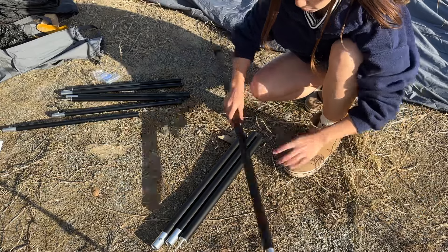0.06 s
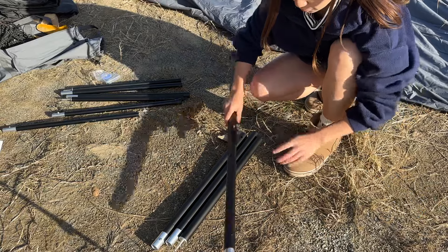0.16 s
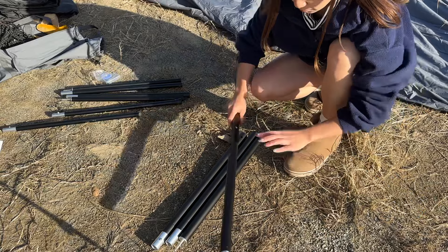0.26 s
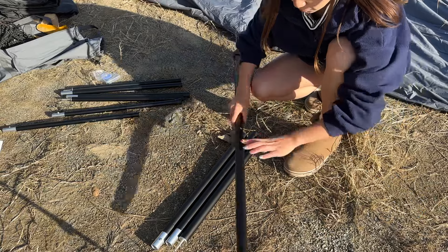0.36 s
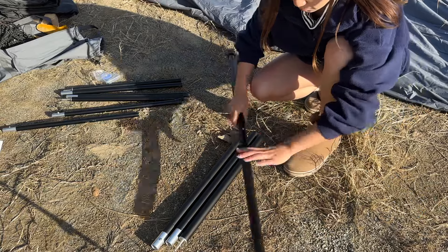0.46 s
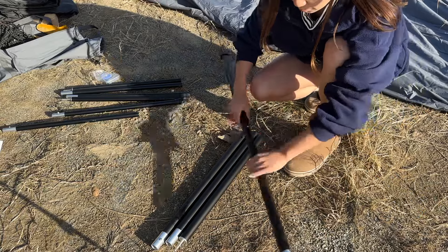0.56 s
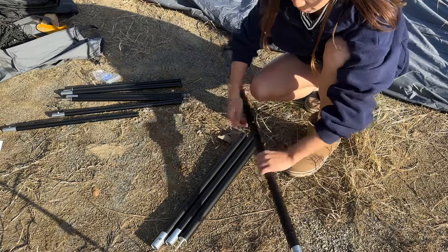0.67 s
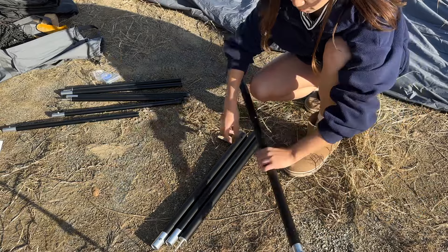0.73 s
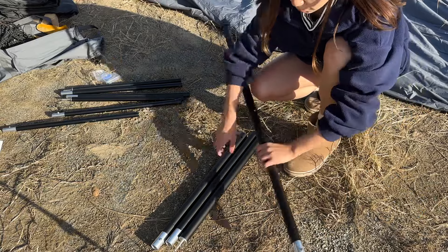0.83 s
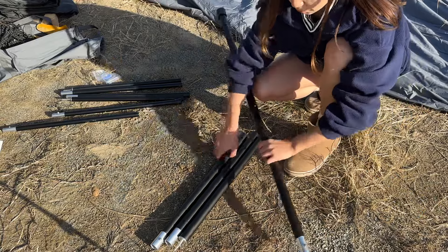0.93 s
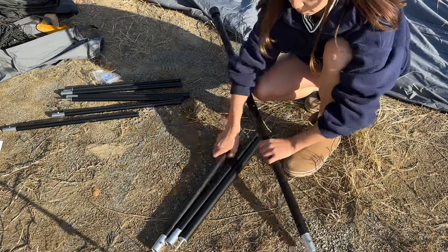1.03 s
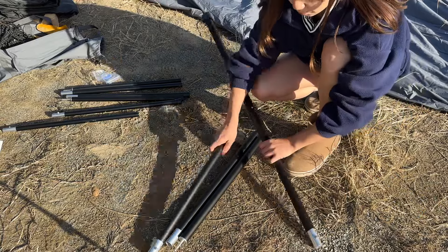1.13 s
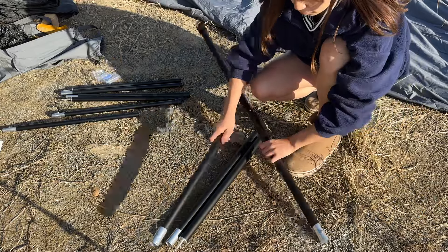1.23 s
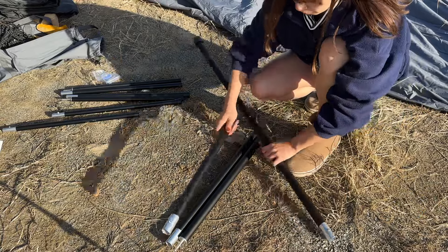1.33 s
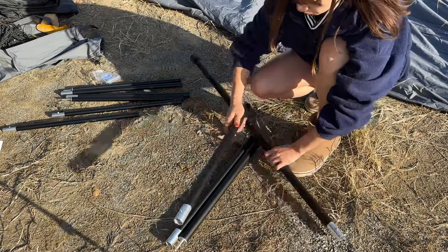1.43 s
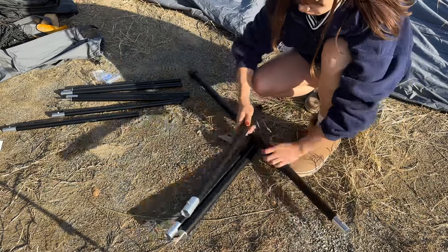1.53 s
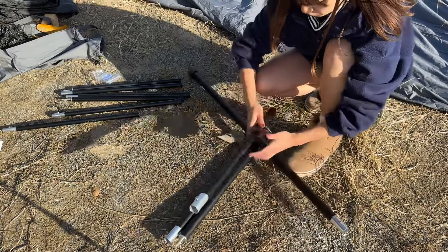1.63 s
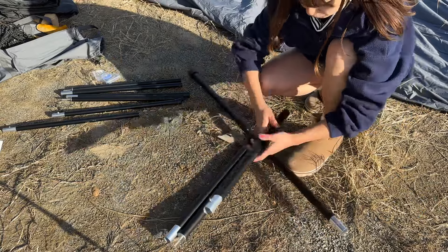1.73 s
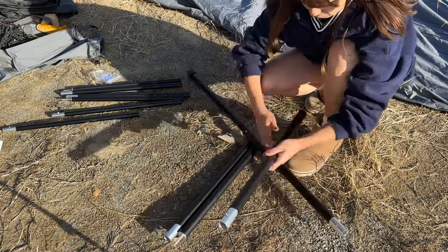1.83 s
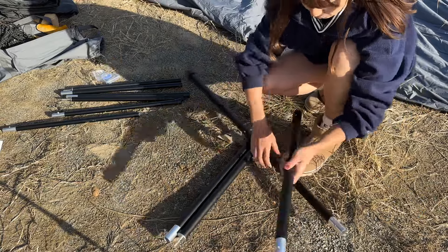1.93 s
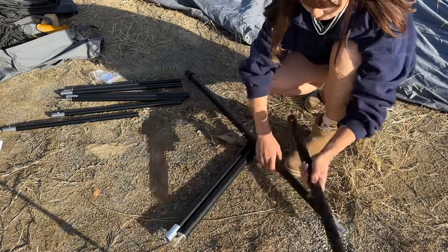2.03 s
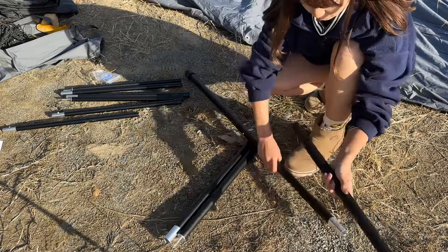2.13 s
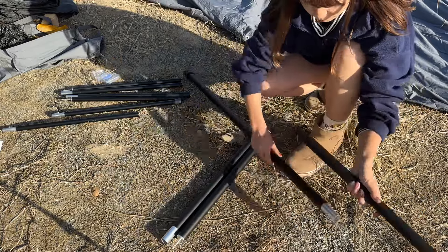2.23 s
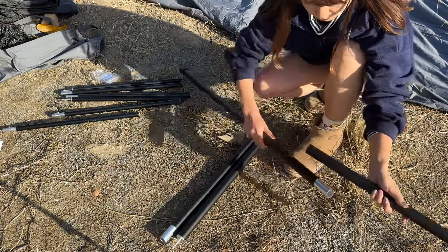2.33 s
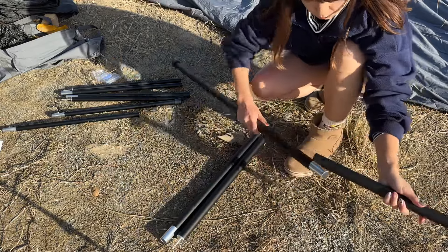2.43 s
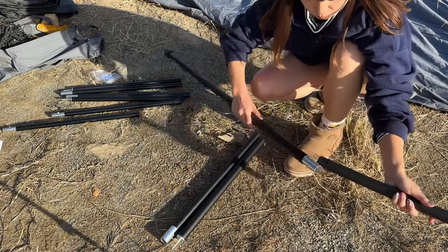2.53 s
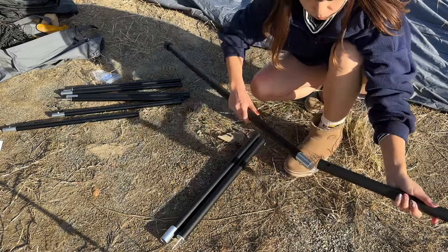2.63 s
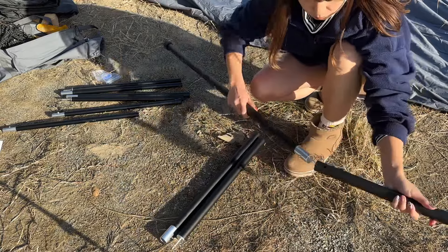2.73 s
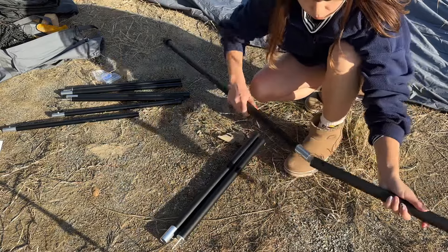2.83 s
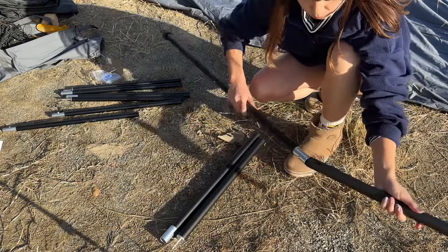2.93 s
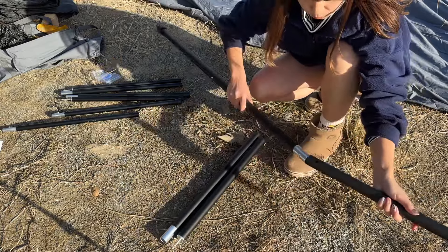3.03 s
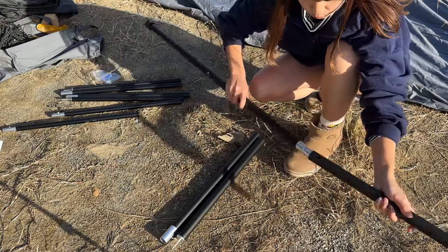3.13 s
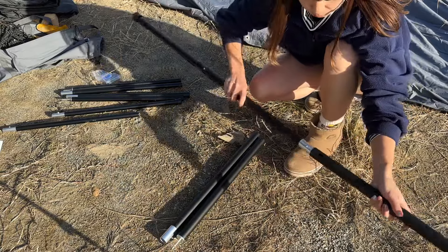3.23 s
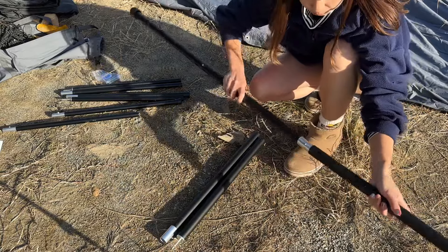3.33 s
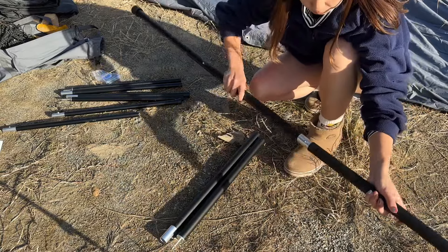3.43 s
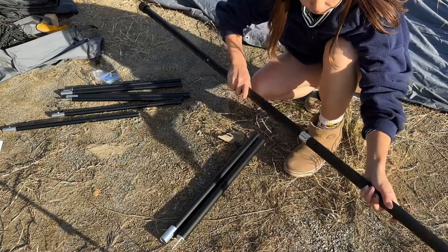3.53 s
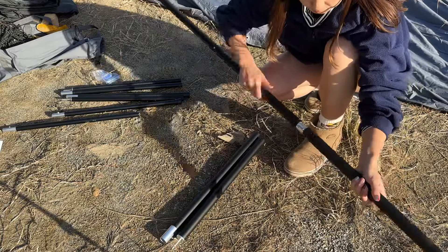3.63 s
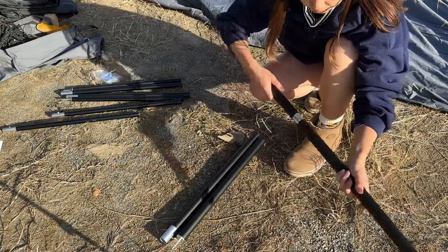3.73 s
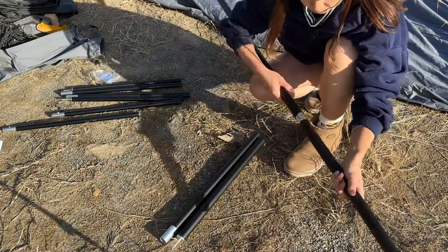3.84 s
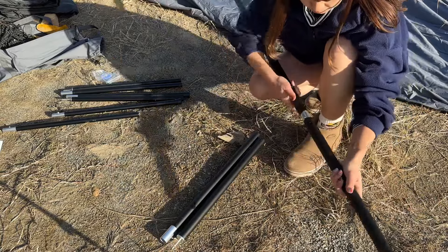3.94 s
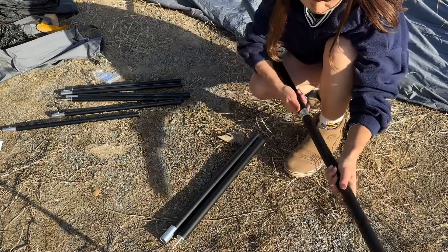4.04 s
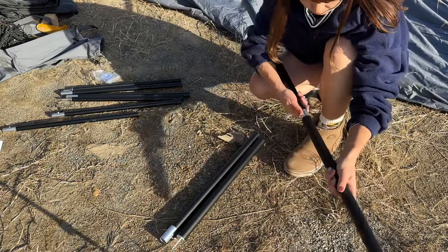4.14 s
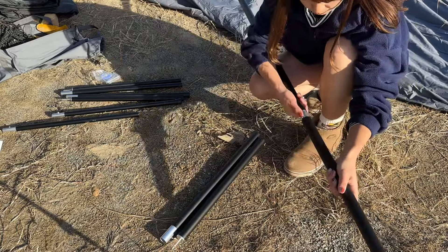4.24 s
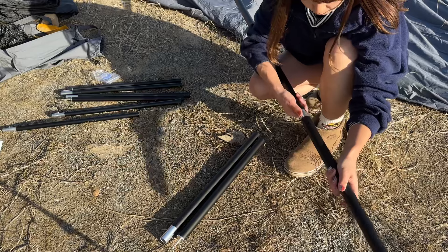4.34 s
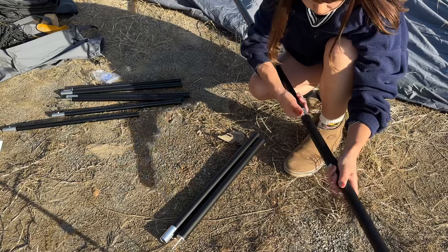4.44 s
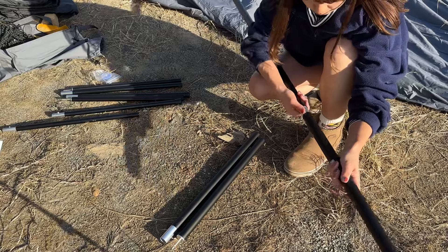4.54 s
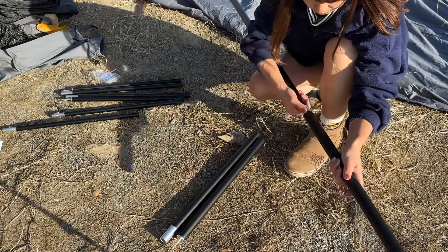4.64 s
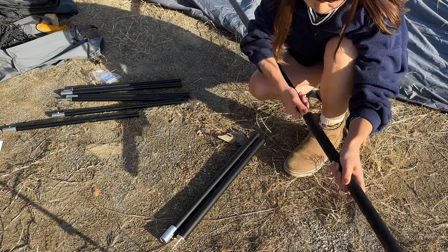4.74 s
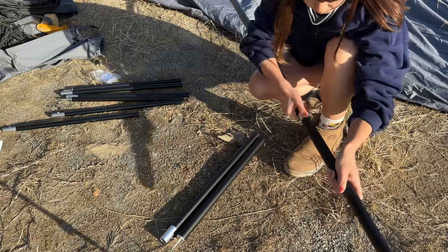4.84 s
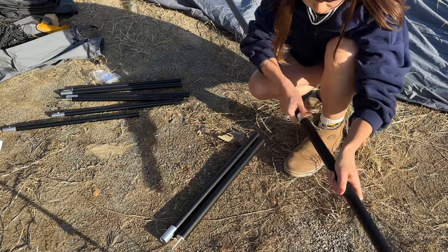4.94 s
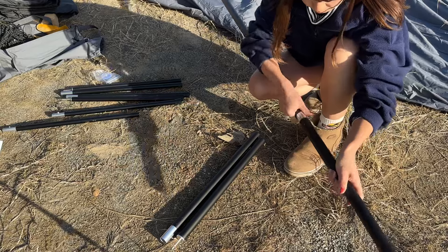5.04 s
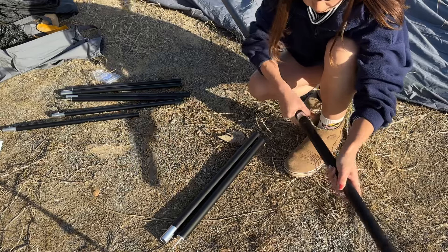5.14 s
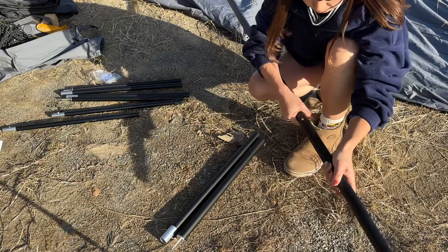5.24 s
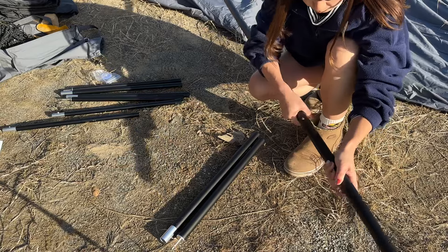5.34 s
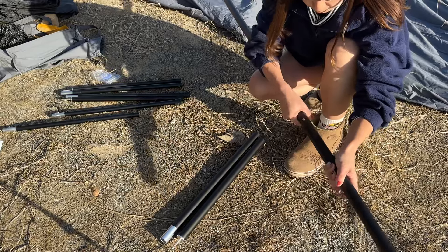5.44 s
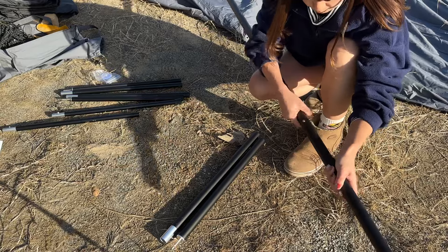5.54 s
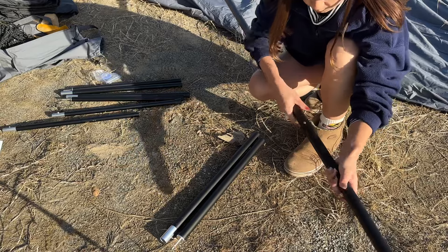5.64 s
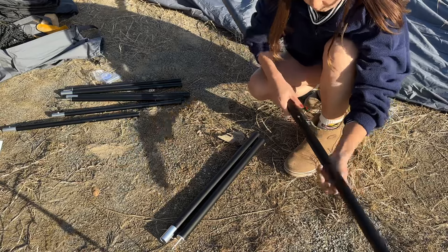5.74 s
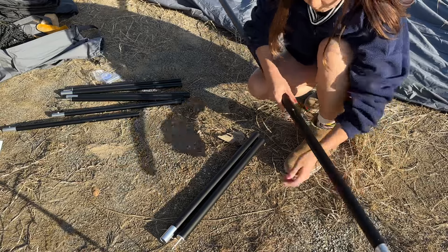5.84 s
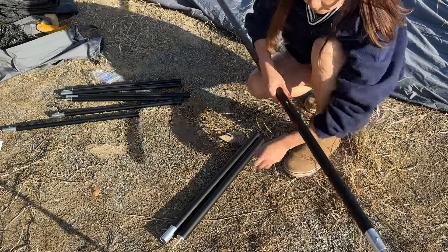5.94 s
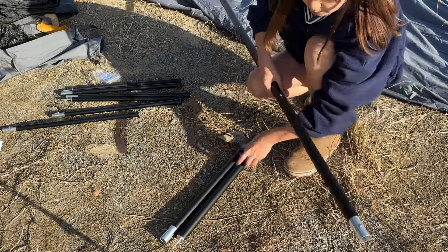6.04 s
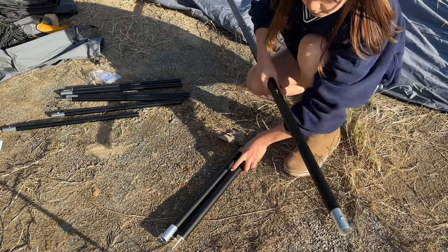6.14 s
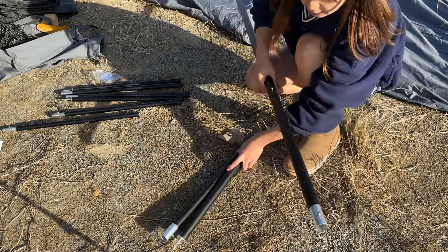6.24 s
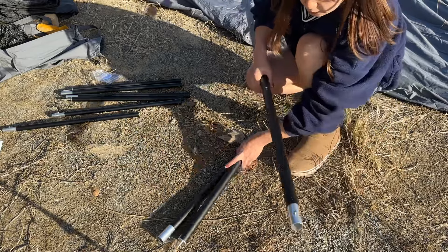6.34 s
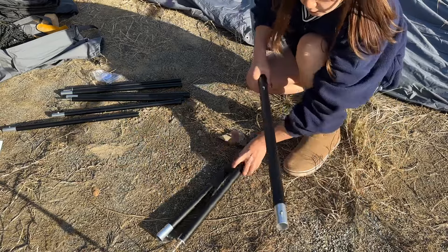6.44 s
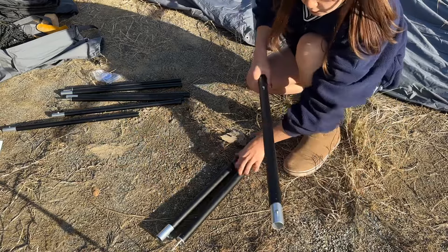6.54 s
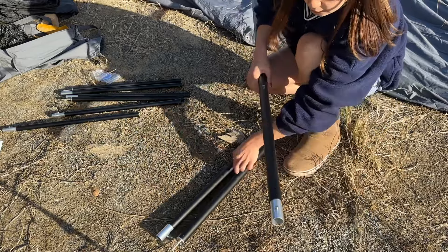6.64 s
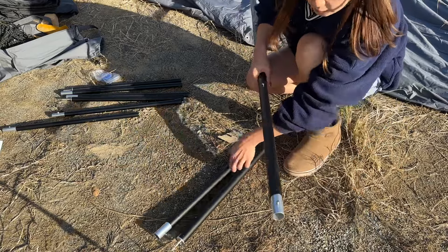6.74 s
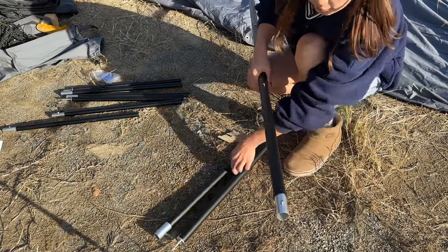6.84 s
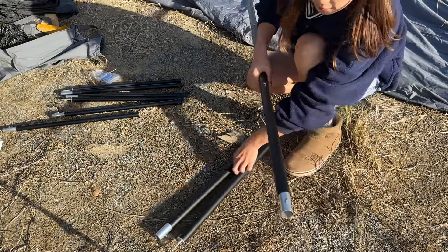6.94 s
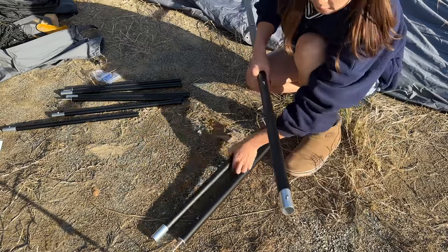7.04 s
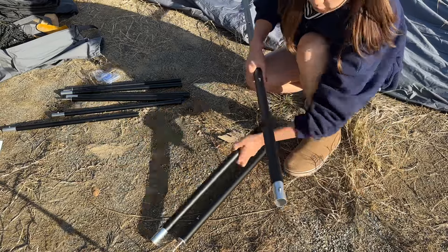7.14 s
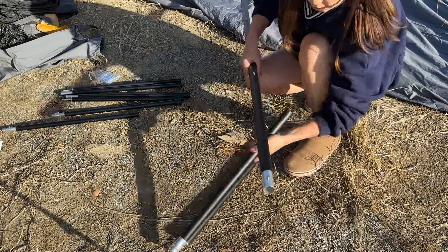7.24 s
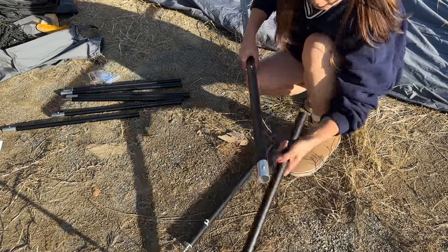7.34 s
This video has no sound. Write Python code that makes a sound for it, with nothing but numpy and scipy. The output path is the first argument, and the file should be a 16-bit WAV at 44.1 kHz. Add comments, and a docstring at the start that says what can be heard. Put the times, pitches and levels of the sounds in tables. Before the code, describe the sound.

Close, dry knocks of metal-ended tent poles on quiet open ground, with ferrule pings, soft hand swishes, one sharp snap and a final hollow clack.

```python
"""Outdoors on dry ground: tent pole sections are picked off a bundle, close to a two-port microphone.
The tubes clack, chatter and scrape on each other: noise bursts and ringing modes, struck or driven by rough grains.
A metal ferrule rings as it meets the next tube, slides on and snaps home amid a brief rasp.
Hands swish along the poles as swelling, coloured noise, over distant rumble, hum and a faint hiss."""
import sys
import numpy as np
from scipy import signal
from scipy.fft import rfft, irfft
from scipy.io import wavfile
from scipy.ndimage import uniform_filter1d

SR = 44100
rng = np.random.default_rng(int(sys.argv[2]) if len(sys.argv) > 2 else 0)


def file_out(sig):
    """Save sig as 16-bit WAV at sys.argv[1]."""
    # one column per channel
    cols = np.atleast_2d(sig).T
    # limit, then scale
    lim = np.clip(cols, -1, 1)
    pcm = np.round(lim * 32767).astype(np.int16)
    wavfile.write(sys.argv[1], SR, pcm)


N = 325458
SIZE = 2 ** 15  # samples in one struck sound
TIME = np.arange(N) / SR  # s, through the scene
AGE = np.arange(SIZE) / SR  # s, since the start of a struck sound

# bending modes of the tubes, in close pairs: (frequency [Hz], level [dB], t60 [s])
TUBE_MODES = [(1570, -8.5, 0.35), (1581.4, -2, 0.11), (1824, -19, 0.28), (2610, -19, 0.13),
              (2850, -5.5, 0.17), (2856, 0, 0.15), (2927, -6.5, .15), (4120, -28.5, .42),
              (4300, -16.5, .17), (4400, -19, 0.19), (6180, -21.5, .16), (6750, -27, .12),
              (7460, -22, 0.11), (8200, -19.5, 0.099), (9040, -17, 0.13), (9500, -28, .15),
              (10450, -34, .2), (12500, -36, .15)]
# modes of the metal ferrule: (frequency [Hz], level [dB], t60 [s])
FERRULE_MODES = [(1230, -17, 0.11), (2826, -7.5, 0.077), (4272, -22.5, .15), (5350, 2, 0.47),
                 (5510, -4.5, 0.16), (6580, -10, .15), (8483, -27.5, 0.48), (8960, -8, 0.1),
                 (15140, -9.5, .12), (15600, -14, .1)]
# air column and thin wall of the hollow tube: (frequency [Hz], level [dB], t60 [s])
BORE_MODES = [(579, -1, 0.15), (644, -2, .05), (1157, -19, .22), (1730, -9, 0.15), (2290, -25, 0.42),
              (5640, -27, .7), (8500, -27.5, .55)]
# colour of the clack, also of the rattling bundle: (frequency [Hz], level [dB])
CLACK_COLOUR = [(150, -30.5), (450, -24.5), (800, -21), (1050, -10.5), (1280, -8), (1450, -6.5), (1750, 1),
                (2300, -3), (2900, -6), (3600, -24.5), (6000, -43)]
# crowded treble modes of the tube wall: (frequency [Hz], level [dB])
WALL_COLOUR = [(3000, -25.5), (4400, -17), (5200, -4), (6300, 9), (9000, 3.5), (10400, -1), (11700, -17),
               (16000, -21)]
BUNDLE_T60_S = 0.1  # rattle of the neighbouring poles


def undb(db):
    """Decibels to gain."""
    return 10 ** (np.asarray(db) / 20)


def unit(x):
    """Scale to rms 1."""
    return x / np.sqrt(np.mean(x ** 2))


def along(points, count):
    """Read (Hz, value) points at the bins of a transform of count samples, on a log frequency axis."""
    hz, value = np.transpose(points)
    bin_hz = np.arange(count // 2 + 1) * SR / count
    return np.interp(np.log(bin_hz + 1), np.log(hz), value)


def tint(x, db):
    """Causal (minimum-phase) filter with a gain in dB for every bin."""
    count = len(x)
    cepstrum = irfft(np.log(undb(db)), count)
    # folding the cepstrum forward in time makes the filter causal
    cepstrum[1:count // 2] *= 2
    cepstrum[count // 2 + 1:] = 0
    return irfft(rfft(x) * np.exp(rfft(cepstrum)), count)


def coloured(x, points):
    """A steady sound given a (Hz, dB) colour, at rms 1."""
    return unit(tint(x, along(points, len(x))))


def fade(t60):
    """Exponential decay by 60 dB in t60 seconds."""
    return np.exp(-np.log(1000) * AGE / t60)


def walk(rate):
    """Smooth random wander at rms 1, with about rate new values a second."""
    hold = int(SR / rate)
    steps = np.repeat(rng.standard_normal(N // hold + 1), hold)
    smooth = uniform_filter1d(uniform_filter1d(steps, hold), hold)
    return unit(smooth[:N])


def swell(start, top, end, curve=2.25):
    """Pressure of one stroke: rises to its top and falls away."""
    return np.sin(np.pi / 2 * np.interp(TIME, [start, top, end], [0, 1, 0])) ** curve


def add(track, s, sound):
    """Mix a sound into a track at time s."""
    i = int(s * SR)
    track[i:i + SIZE] += sound[:N - i]


def burst(colour, t60):
    """A crowd of heavily damped modes, evenly excited by one short contact; starts near rms 1."""
    crowd = rng.standard_normal(SIZE) * fade(t60) * (1 - fade(0.003))
    # level out the chance spectrum of the noise before colouring it
    uneven_db = 10 * np.log10(uniform_filter1d(np.abs(rfft(crowd)) ** 2, size=301))
    shaped = unit(tint(crowd, along(colour, SIZE) - uneven_db))
    return shaped * np.sqrt(np.mean(fade(t60) ** 2))


def ring(modes, low_db=0, spread_db=2.5, detune=.003):
    """Decaying modes; the place of contact and the grip shift each a little in level and pitch."""
    hz, db, t60 = np.transpose(modes)
    size, shift, phase = rng.standard_normal((len(hz), 3)).T
    gain = undb(db + spread_db * size + low_db * (hz < 1700))  # low_db shifts the lowest modes only
    turn = 2 * np.pi * np.outer(hz * (1 + detune * shift), AGE) + np.pi * phase[:, None]
    decay = np.exp(np.float32(-np.log(1000) * np.outer(1 / t60, AGE)))
    waves = np.sin(np.float32(turn)) * decay
    return (gain[:, None] * waves).sum(0) * (1 - fade(0.004))


def background(waver_db, hum_db, hiss_db):
    """Distant rumble, alike at both ports in the bass, with a wavering machine hum and a faint band of hiss."""
    # colour of the distant rumble: (frequency [Hz], level [dB])
    air_colour = [(20, -28), (31, -12.5), (46, -1), (80, -3.5), (112, -13.5), (150, -11.5), (236, -15.5),
                  (319, -17), (420, -21), (560, -21.5), (2080, -37.5), (3000, -47.5), (6500, -56.5),
                  (8500, -61), (16000, -71)]
    # likeness of the rumble at the two ports: (frequency [Hz], correlation)
    air_likeness = [(60, 1), (170, .85), (330, 0.17), (800, 0.13), (3000, .1)]
    # distant machine hum: (frequency [Hz], level [dB rms])
    hum_tones = [(48, -55.5), (71, -62.5), (141, -62.5), (279, -72), (321, -69.5)]
    # colour of the faint hiss: (frequency [Hz], level [dB])
    hiss_colour = [(3000, -25.5), (5000, -7), (6100, 2), (6900, -6.5), (8200, -18.5), (12000, -24.5)]
    air_db = -48.5  # rms of the part common to both ports

    likeness = np.clip(along(air_likeness, N), -1, 1)
    mid, side = (
        irfft(rfft(rng.standard_normal(N)) * undb(along(air_colour, N)) * np.sqrt(1 + sign * likeness), N)
        for sign in (1, -1))
    air = np.array([mid + side, mid - side]) / np.std(mid) * undb(air_db + waver_db * walk(7.6))

    hum = np.zeros(N)
    for hz, db in hum_tones:
        tone = np.sin(2 * np.pi * hz * TIME + 1.3 * walk(5))  # the phase wanders too
        hum += undb(db) * unit(tone * undb(hum_db * walk(4)))

    hiss = np.array([coloured(rng.standard_normal(N), hiss_colour) for _ in range(2)])
    return air + hum + undb(hiss_db) * hiss


def swishes(flutter_db, curve):
    """Skin on the smooth tube: a soft, high hiss that swells and dies away with the speed of the hand."""
    # a palm sliding along a pole: (start [s], fastest [s], end [s], hiss level [dB])
    palm_strokes = [ (0.502, 0.56, 0.64, -67), (1.98, 2.03, 2.17, -71), (2.92, 3.139, 3.16, -61),
                    (3.47, 3.624, 3.8, -50.5), (3.827, 3.953, 4.1, -55), (4.29, 4.35, 4.4, -69),
                    (4.66, 4.777, 4.89, -65), (4.898, 4.937, 4.99, -71.5), (5.46, 5.619, 5.8, -62)]
    # colour of skin on the tube: (frequency [Hz], level [dB])
    palm_colour = [(1000, -21), (2500, -7), (4500, -5), (7000, 1), (9800, 4), (12500, -5.5), (16000, -4.5)]
    force = sum(undb(db) * swell(start, top, end, curve) for start, top, end, db in palm_strokes)
    hiss = coloured(rng.standard_normal(N), palm_colour)
    return force * hiss * undb(flutter_db * walk(60))


def friction():
    """Force of all rubs and rasps on four things: the bare grit, the low and high tube modes, the ferrule."""
    # pole rubbing on pole: (start [s], strongest [s], end [s], low tube modes [dB], high tube modes [dB])
    pole_rubs = [ (0.837, 0.892, 0.984, -41, -57), (0.957, 1.037, 1.163, -40.5, -46.5),
                 (1.102, 1.107, 1.19, -48, -58), (1.652, 1.697, 1.877, -60, -63),
                 (2.073, 2.16, 2.346, -49.5, -62), (6.045, 6.192, 6.416, -46.5, -49.5),
                 (6.338, 6.452, 6.67, -49, -53), (6.603, 6.631, 6.85, -45.5, -35.5),
                 (6.717, 6.796, 6.89, -44, -37.5), (6.79, 6.932, 7.354, -58.5, -56)]
    # rasps at the joint: the ferrule slides over the next tube; the last row is a brief rasp around the snap:
    # (start [s], strongest [s], end [s], rasp [dB], ferrule ring [dB])
    joint_rasps = [ (2.4, 2.447, 2.485, -39.5, -29.5), (2.455, 2.57, 2.62, -54.5, -49),
                   (3.134, 3.196, 3.25, -49.5, -73.5), (3.396, 3.432, 3.452, -48.5, -66),
                   (3.456, 3.497, 3.505, -43.5, -66), (5.083, 5.143, 5.216, -38.5, -60)]
    rub_grit_db, rub_ferrule_db = -9, -15.5  # grit against the low modes, ferrule against the high modes
    rasp_low_db, rasp_high_db = -24, -17.5  # low and high tube modes against the rasp

    forces = np.zeros((4, N))
    for start, top, end, low_db, high_db in pole_rubs:
        levels_db = [low_db + rub_grit_db, low_db, high_db, high_db + rub_ferrule_db]
        forces += np.outer(undb(levels_db), swell(start, top, end))
    for start, top, end, rasp_db, ring_db in joint_rasps:
        levels_db = [rasp_db, rasp_db + rasp_low_db, rasp_db + rasp_high_db, ring_db]
        forces += np.outer(undb(levels_db), swell(start, top, end))
    return forces


def scrapes(rough_db, catch_db, low_db, damping_t60, wall_db, wall_t60, bundle_db, shift_db):
    """Surface grains catch and slip, rasping and feeding the modes of both tubes, now more one, now the other."""
    # colour of the bare grit: (frequency [Hz], level [dB])
    grit_colour = [(400, -19.5), (1200, -3.5), (2300, 0), (3500, -11), (6000, -6), (9500, 0.5), (11500, -8),
                   (16000, -9.5)]
    grains = unit(rng.standard_normal(N) * undb(rough_db * walk(900) + catch_db * walk(70)))
    grit_force, *mode_forces = friction()
    low_modes = [mode for mode in TUBE_MODES if mode[0] < 3500]
    high_modes = TUBE_MODES[len(low_modes):]
    damping = fade(damping_t60)  # the rubbing contact shortens every ring

    out = grit_force * coloured(grains, grit_colour)
    lean = shift_db * walk(14)
    for share in (undb(lean), undb(-lean)):
        drive = grains * share / np.hypot(undb(lean), undb(-lean))
        # the bundle in the middle range and the thin wall in the treble add crowds of short-lived modes
        bundle = undb(bundle_db) * unit(burst(CLACK_COLOUR, BUNDLE_T60_S))
        low = unit(ring(low_modes, low_db) * damping) + bundle
        wall = undb(wall_db) * unit(burst(WALL_COLOUR, wall_t60))
        high = (unit(ring(high_modes) * damping) + wall) * damping  # the treble modes are damped twice
        ferrule = ring(FERRULE_MODES) * damping
        for force, response in zip(mode_forces, (low, high, ferrule)):
            even_response = response / np.sqrt(np.sum(response ** 2))
            out += signal.fftconvolve(force * drive, even_response)[:N]
    return out


def contact(clack_db, pitch, tick_db, t60):
    """A dry clack, pitched by the hardness of the contact, and a bright tick."""
    # colour of the tick: (frequency [Hz], level [dB])
    tick_colour = [(1500, -31), (3500, -8.5), (4800, -6), (6300, 3), (7500, 0), (9200, 6), (10300, -2),
                   (11500, -12.5), (13500, -13), (15500, -14.5)]
    clack_colour = [(hz * pitch, db) for hz, db in CLACK_COLOUR]
    return undb(clack_db) * burst(clack_colour, t60) + undb(tick_db) * burst(tick_colour, t60)


def taps():
    """The ferrule finds the next tube: it pings while free and clicks dryly once the tube is in it."""
    # the ferrule meets the next tube, first free, then deadened by the tube inside it:
    # (time [s], clack level [dB], tick over the clack [dB], ping level [dB], added damping t60 [s])
    ferrule_taps = [ (2.41, -34, -8, -37.5, 1.5), (2.421, -35, -3, -33.5, 1.5), (2.476, -29, -5, -42, 1.5),
                    (2.815, -33, -11.5, -47, .04), (2.889, -24.5, -2.5, -30.5, 0.055),
                    (2.923, -37, -3.5, -41, 0.063), (2.958, -40.5, -12, -60, 0.055)]
    pitch, contact_t60_s = 0.74, 0.04
    tube_db, tube_t60_s = -9, 0.068  # the held tube answers briefly, against the clack

    out = np.zeros(N)
    for s, db, tick_db, ping_db, damping_t60 in ferrule_taps:
        ping = undb(ping_db) * ring(FERRULE_MODES) * fade(damping_t60)
        tube = undb(db + tube_db) * ring(TUBE_MODES) * fade(tube_t60_s)
        add(out, s, contact(db, pitch, db + tick_db, contact_t60_s) + ping + tube)
    return out


def joint(s, db, t60):
    """The tube hits the bottom of the ferrule; both hands damp it, so it snaps without ringing."""
    # colour of the snap: (frequency [Hz], level [dB])
    snap_colour = [(200, -33), (650, -18), (1000, -18.5), (1400, -13), (1600, -1), (1850, 3.5), (2200, -17),
                   (2500, -0.5), (2750, -1.5), (3100, -12), (4700, -17.5), (6500, -12.5), (9800, -9.5),
                   (12500, -17), (16000, -28.5)]
    out = np.zeros(N)
    add(out, s, undb(db) * burst(snap_colour, t60))
    return out


def blow(db, pitch, tick_db, tube_db, low_db):
    """One contact, longer the weaker it is; the tube rings on and shakes bundle, wall, ferrule and bore."""
    firm_db, firm_t60_s = -25.5, 0.035  # a firm blow and the decay of its contact
    graze_per_db = 0.025  # weaker blows graze: growth rate of the contact's decay time per dB
    roll_hz = 7500  # the length of a contact weakens treble modes: by 6 dB here, untouched below half of it
    bundle_db, wall_db, wall_t60_s = -7, -13, 0.11  # rattle and wall shimmer, against the tube ring
    bore_db = -36  # against the clack
    ferrule_db = -28 + (tick_db + tube_db) / 2  # the ferrule rings along with tick and tube

    contact_t60 = firm_t60_s * np.exp(graze_per_db * (firm_db - db))
    struck_modes = []
    for hz, mode_db, decay in TUBE_MODES:
        loss_db = 20 * np.log10(1 + (hz / roll_hz) ** 2) * (hz > roll_hz / 2)
        struck_modes.append((hz, mode_db - loss_db, decay))
    bundle = undb(bundle_db) * burst(CLACK_COLOUR, BUNDLE_T60_S)
    wall = undb(wall_db) * burst(WALL_COLOUR, wall_t60_s)
    tube = undb(tube_db) * (ring(struck_modes, low_db, detune=0.005) + bundle + wall)
    ferrule = undb(ferrule_db) * ring(FERRULE_MODES)
    bore = undb(bore_db) * ring(BORE_MODES)
    return contact(db, pitch, db + tick_db, contact_t60) + undb(db) * (tube + ferrule + bore)


def knocks():
    """Poles knock and chatter together; a bump on an open end adds the hollow note of the air column."""
    # pole against pole: (time [s], clack level [dB], clack pitch ratio, tick over the clack [dB],
    # tube ring over the clack [dB], extra level of the lowest tube modes [dB])
    pole_knocks = [ (0.487, -51.5, 1.87, -22, -26, 0), (0.747, -50.5, .95, -8.5, -10.5, 3),
                   (0.869, -29.5, 1.1, -1.5, -8, 5), (0.8756, -28, 1.15, 0, -5, 4),
                   (0.894, -28.5, 0.97, -6.5, -19, -7), (0.904, -32.5, 1.15, -9, -4, 5.5),
                   (0.958, -31.5, 1, -7, -14, 16), (0.967, -31, 1.04, 0, -7, -3),
                   (0.979, -38, .85, -4, -3, 19), (1.021, -38.5, 1.09, -6, -10, 15),
                   (1.438, -6.5, 1.06, -13, -13, -6), (1.458, -26, .85, -9, -16, -8),
                   (1.516, -41, .9, -16, -12, 12), (1.5364, -34, 0.98, -15, -7, 10),
                   (1.567, -11, 1.03, -7.5, -16.5, -8), (1.5951, -21, 1, -28, 2, -16),
                   (1.603, -14.5, 0.99, -10.5, -15, -9), (1.716, -42.5, 0.75, -15, -32, 4),
                   (2.150, -45, 1.15, -8, -1.5, 7), (2.191, -58, .6, 11.5, 2.5, 15.5),
                   (3.466, -52, 1.3, 14, -18, -4), (3.5, -35.5, 1.03, 7, -12.5, -11),
                   (4.131, -61.5, 2.5, -8, -26, 0), (6.1584, -18.5, .94, 1, -8.5, -4),
                   (6.1667, -19, .96, -5.5, -11.5, 9), (6.220, -37, 1.03, -2, -2.5, -1),
                   (6.389, -31.5, 2.45, -12, -18.5, 1), (6.449, -26, 1.03, 1, -5, -19),
                   (6.565, -51, .88, 18, 6, -2), (6.630, -53, 0.76, 25, 8, 6),
                   (7.005, -47, 0.87, 3, -7, -6), (7.1891, -12, 0.94, -0.5, -36, -7),
                   (7.200, -16.5, 1.27, -6, -35, -7)]
    # a tube is bumped on its open end: (time [s], hollow ring level [dB])
    end_bumps = [(0.747, -47.5), (0.967, -45), (1.021, -48), (2.15, -43.5), (3.5, -45.5), (6.16, -33),
                 (6.22, -44.5), (7.1891, -24)]
    out = np.zeros(N)
    for s, *settings in pole_knocks:
        add(out, s, blow(*settings))
    for s, db in end_bumps:
        add(out, s, undb(db) * ring(BORE_MODES, spread_db=1))
    return out


def outdoors(x, side_db, side_t60, far_db, far_t60):
    """Sound glancing off ground and body differs between the ports; a weak tail follows; the left port leads."""
    # shading of the two ports: (frequency [Hz], left minus right [dB])
    port_shading = [(600, 0), (2000, -0.4), (5500, -0.75), (8500, 3.5), (11000, 0.5), (14000, -2.5)]
    # phase by which the left port leads: (frequency [Hz], phase [rad])
    port_lead = [(600, 0.13), (2000, 0.28), (5500, 1.4), (8500, 1.85), (11000, 0.77), (14000, .6)]

    def scatter(t60):
        """Smear the sound with a soft-starting, decaying noise echo."""
        echo = unit(rng.standard_normal(SIZE) * fade(t60) * (1 - fade(t60 / 2)))
        return signal.fftconvolve(x, echo)[:N] / np.sqrt(SIZE)

    glance = scatter(side_t60)
    tails = [scatter(far_t60), scatter(far_t60)]
    out = []
    for side, tail in zip((1, -1), tails):  # left, right
        shading = undb(side * along(port_shading, N) / 2)
        lead = np.exp(side * 1j * along(port_lead, N) / 2)
        heard = irfft(rfft(x + undb(far_db) * tail) * shading * lead, N)
        out.append(heard + side * undb(side_db) * glance)
    return np.array(out)


def scene():
    """Poles and hands near the microphone, over the background."""
    distance = background(waver_db=0.32, hum_db=4.5, hiss_db=-73.5)
    palms = swishes(flutter_db=1.5, curve=1.26)
    hands = outdoors(palms, side_db=-26, side_t60=0.014, far_db=-14.5, far_t60=0.072)
    rubbing = scrapes(rough_db=4.0, catch_db=3.0, low_db=2.0, damping_t60=0.2,
                      wall_db=1.0, wall_t60=0.079, bundle_db=-8.5, shift_db=6.5)
    poles = rubbing + taps() + joint(s=5.1486, db=-6.0, t60=0.015) + knocks()
    near = outdoors(poles, side_db=-12.5, side_t60=0.018, far_db=-17.0, far_t60=0.11)
    return distance + hands + near


def record(dry):
    """A steep low-pass cuts the top of the treble."""
    top_hz = 16100
    low_pass = signal.ellip(10, 0.2, 80, top_hz, fs=SR, output="sos")  # 0.2 dB ripple, 80 dB rejection
    return signal.sosfilt(low_pass, dry)


dry = scene()
out = record(dry)
file_out(out)
```